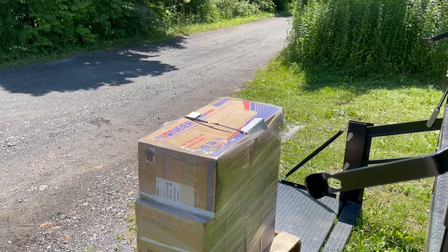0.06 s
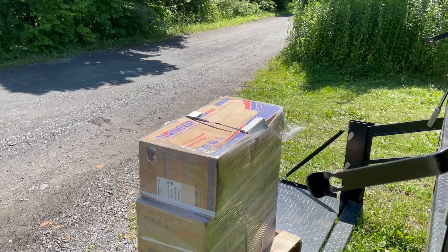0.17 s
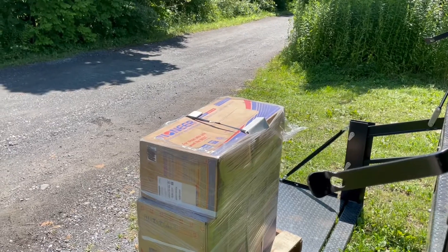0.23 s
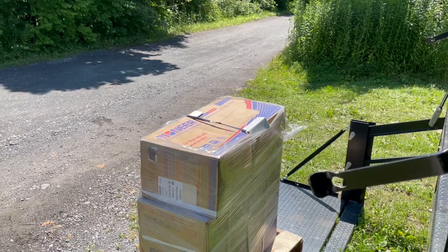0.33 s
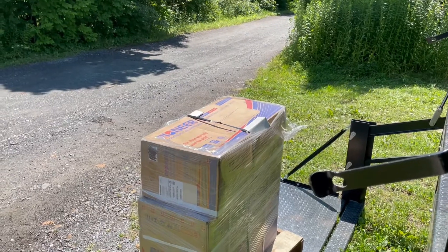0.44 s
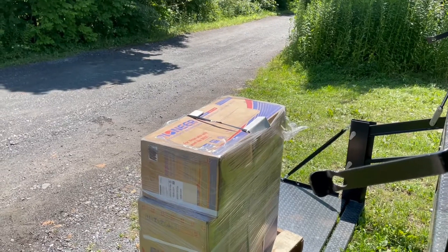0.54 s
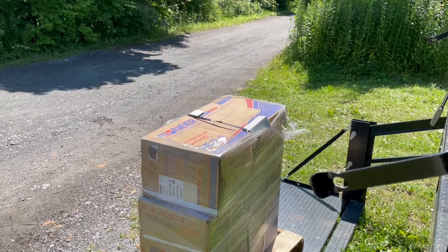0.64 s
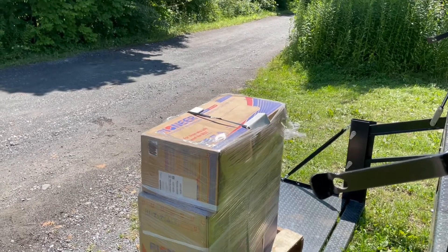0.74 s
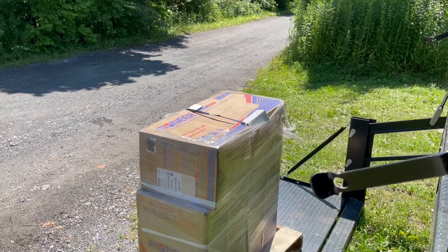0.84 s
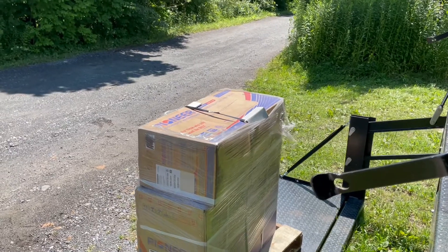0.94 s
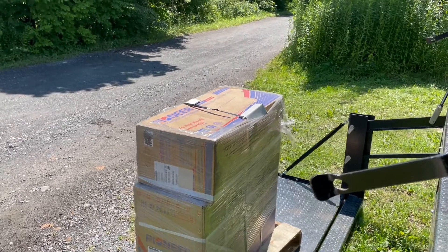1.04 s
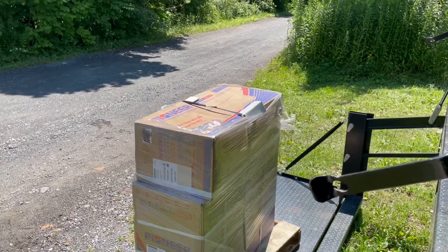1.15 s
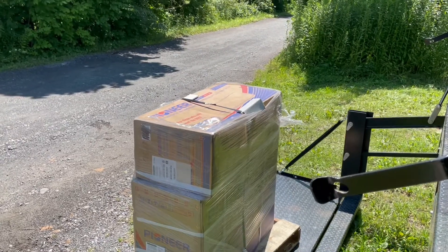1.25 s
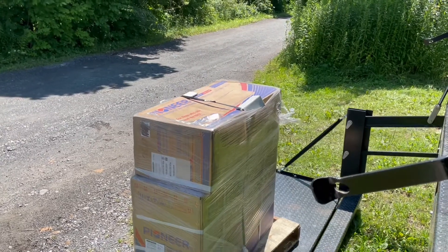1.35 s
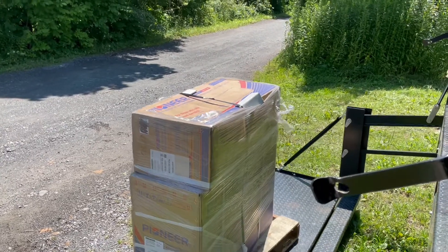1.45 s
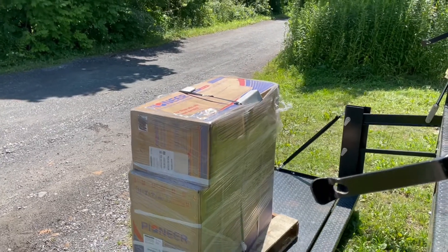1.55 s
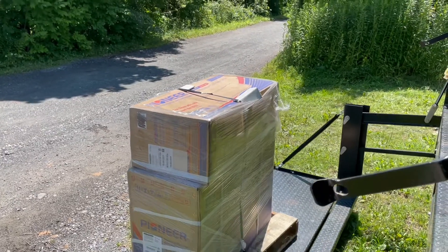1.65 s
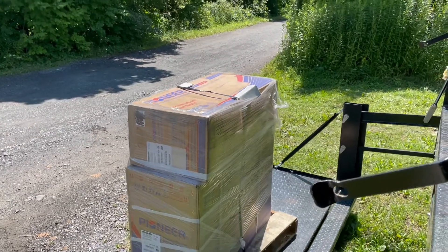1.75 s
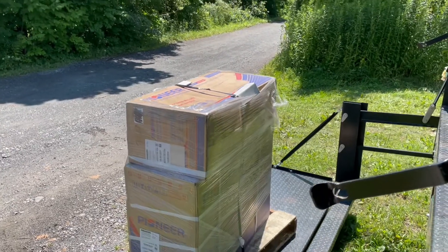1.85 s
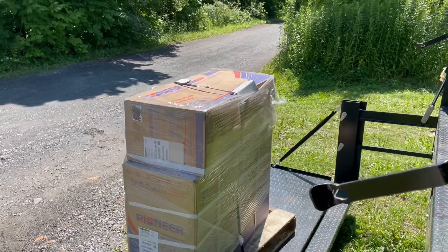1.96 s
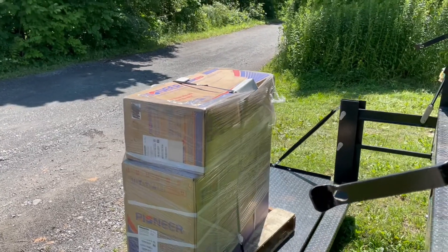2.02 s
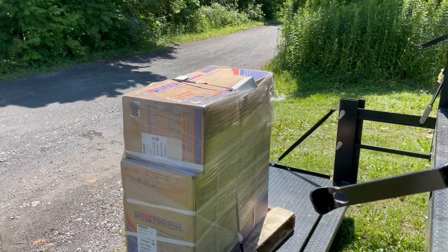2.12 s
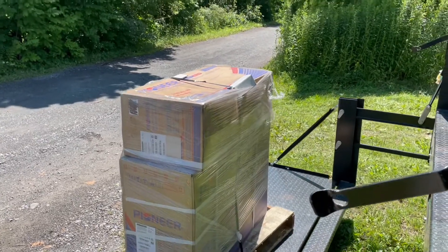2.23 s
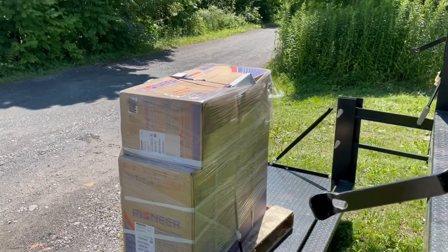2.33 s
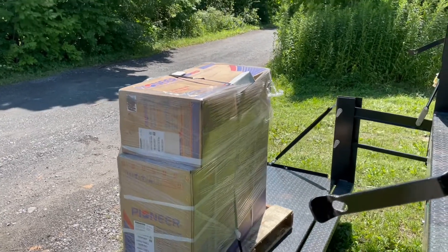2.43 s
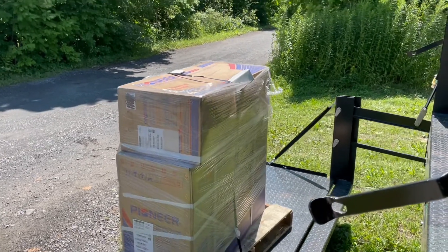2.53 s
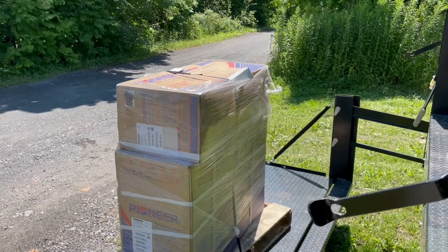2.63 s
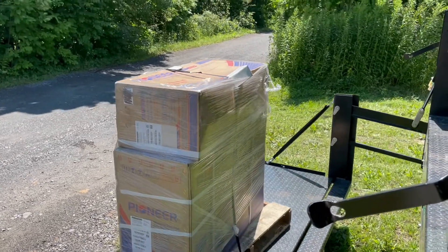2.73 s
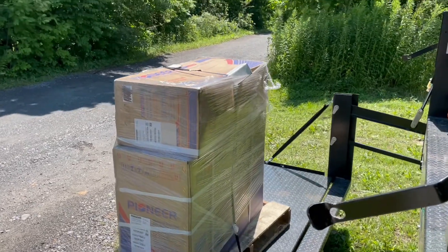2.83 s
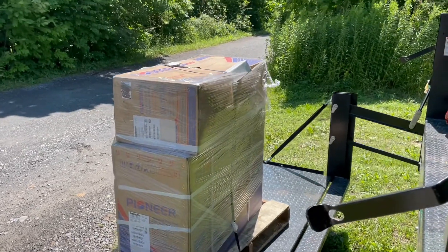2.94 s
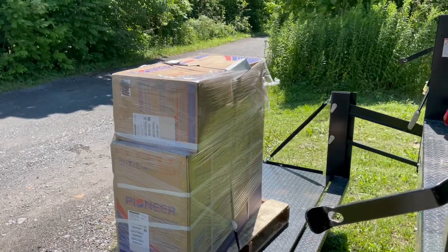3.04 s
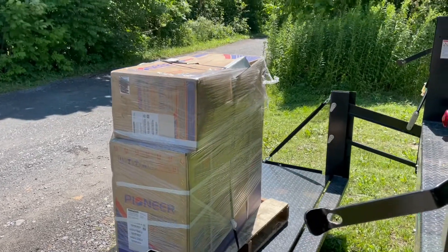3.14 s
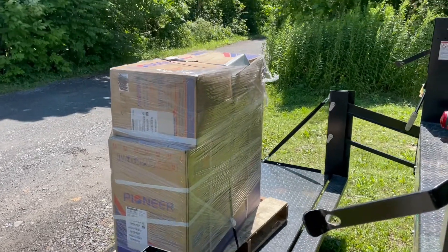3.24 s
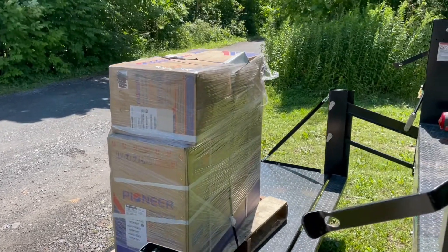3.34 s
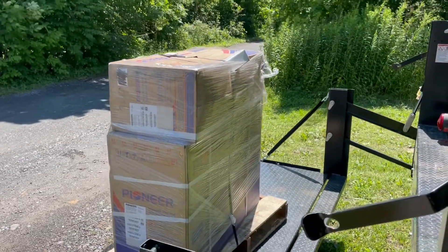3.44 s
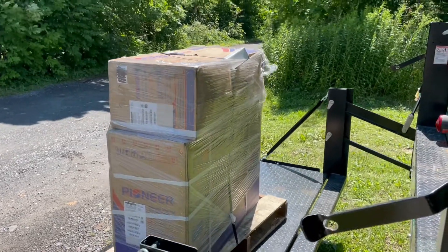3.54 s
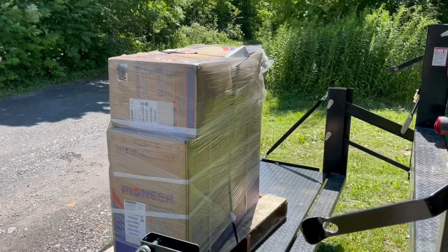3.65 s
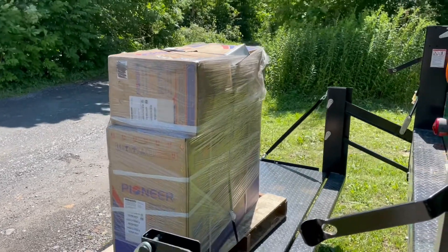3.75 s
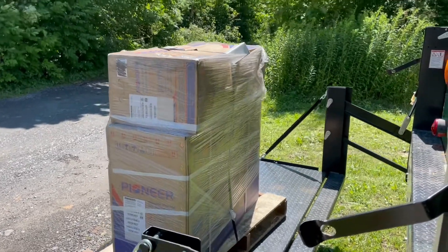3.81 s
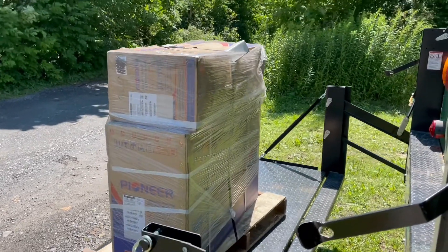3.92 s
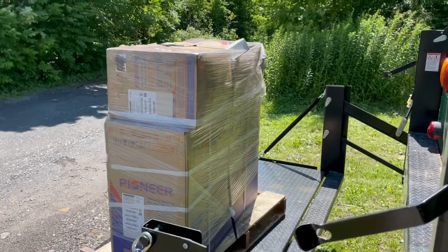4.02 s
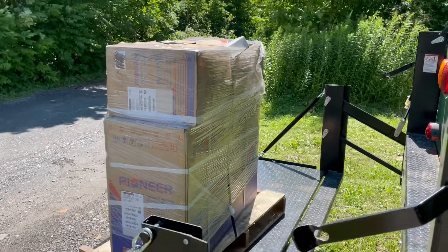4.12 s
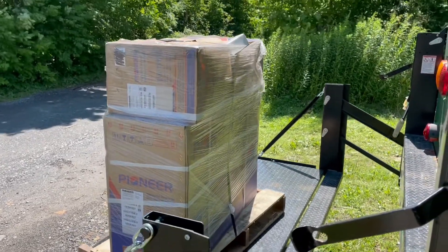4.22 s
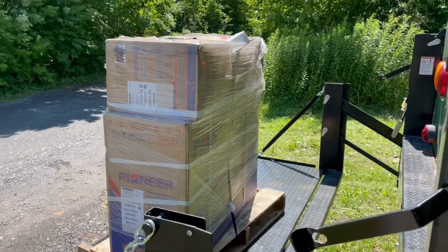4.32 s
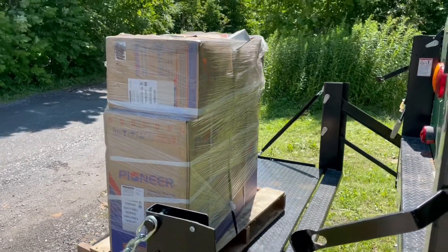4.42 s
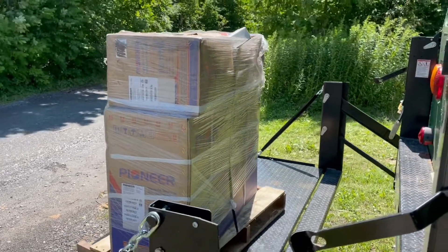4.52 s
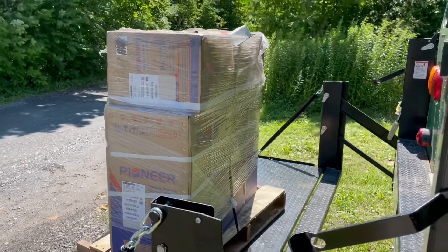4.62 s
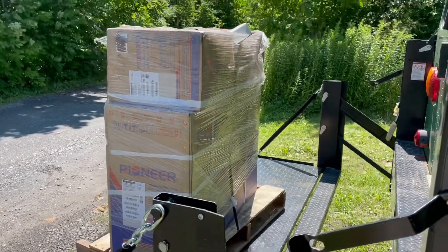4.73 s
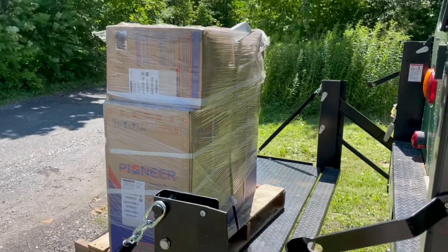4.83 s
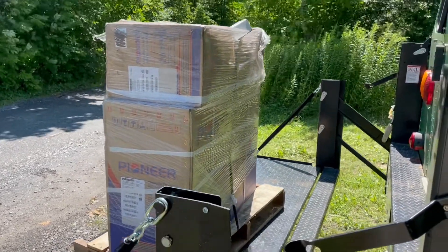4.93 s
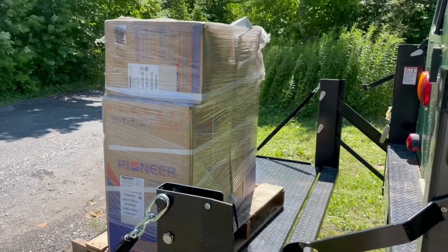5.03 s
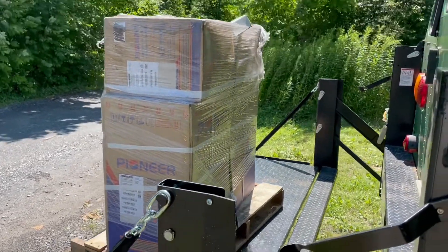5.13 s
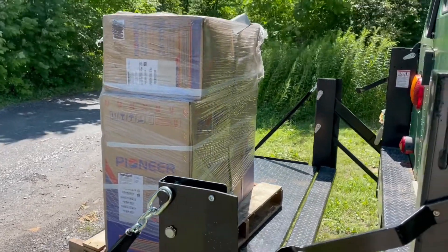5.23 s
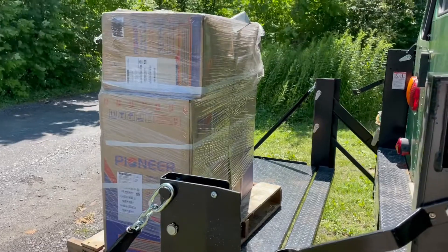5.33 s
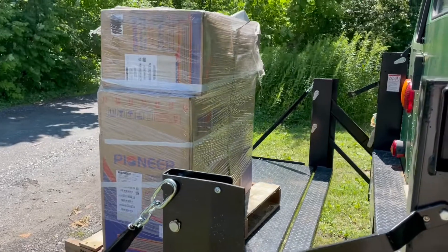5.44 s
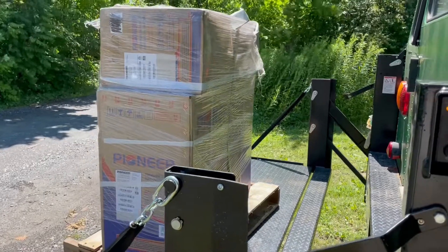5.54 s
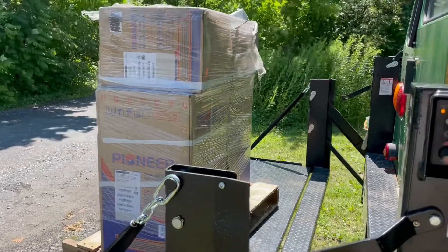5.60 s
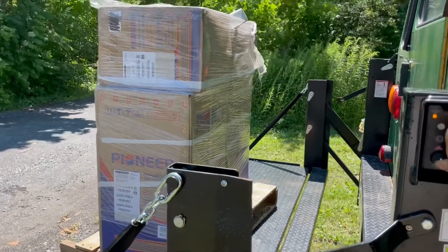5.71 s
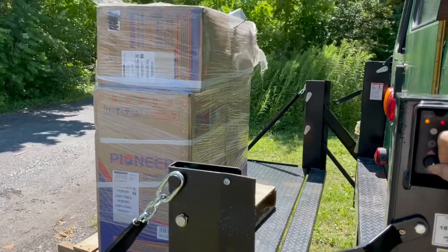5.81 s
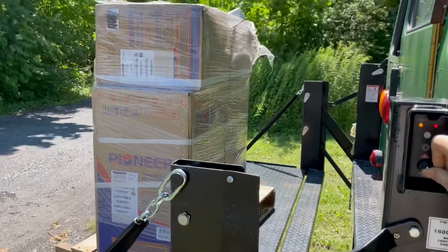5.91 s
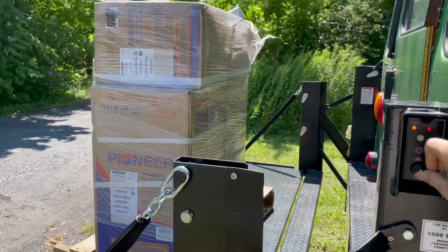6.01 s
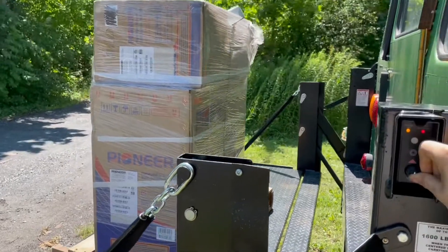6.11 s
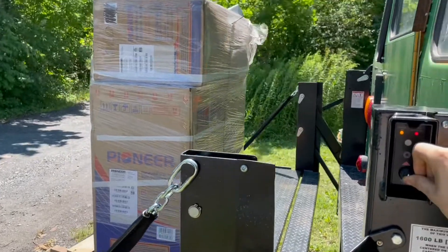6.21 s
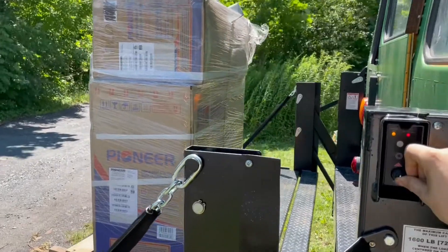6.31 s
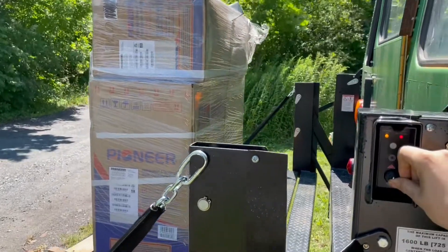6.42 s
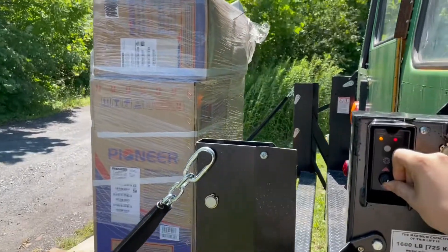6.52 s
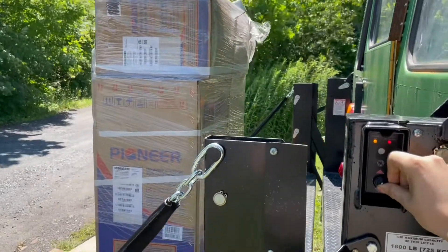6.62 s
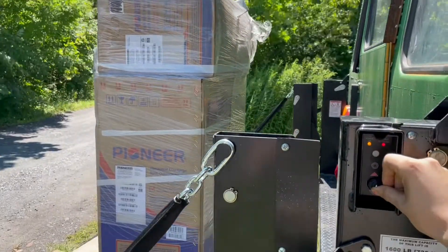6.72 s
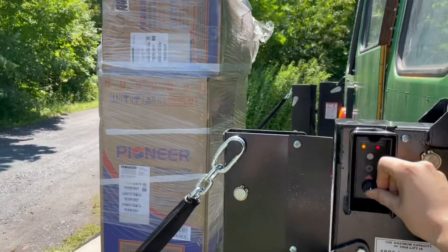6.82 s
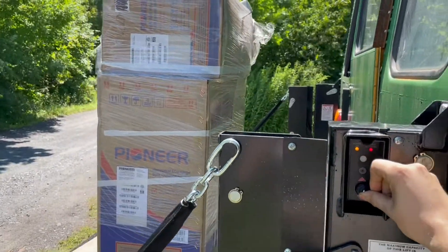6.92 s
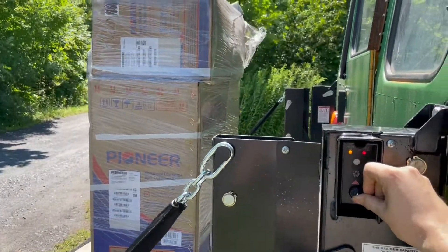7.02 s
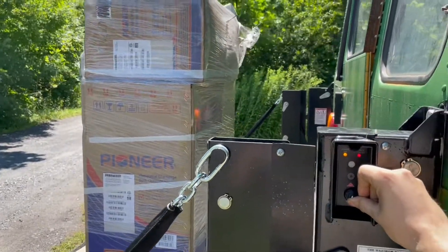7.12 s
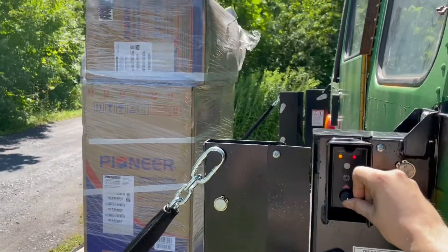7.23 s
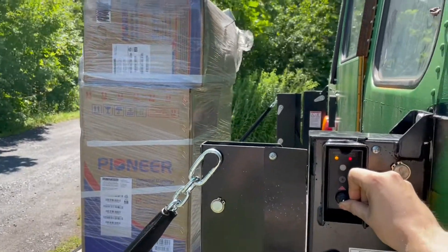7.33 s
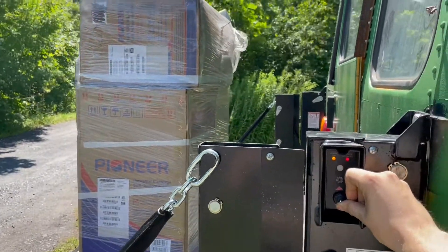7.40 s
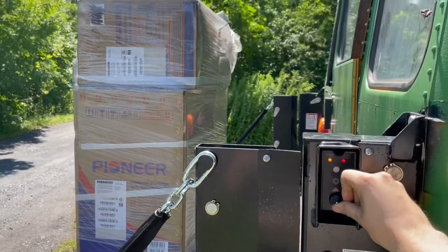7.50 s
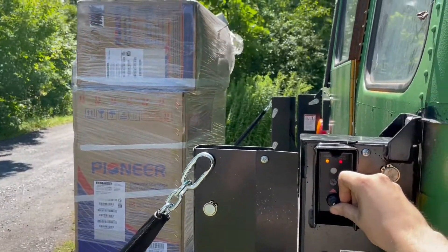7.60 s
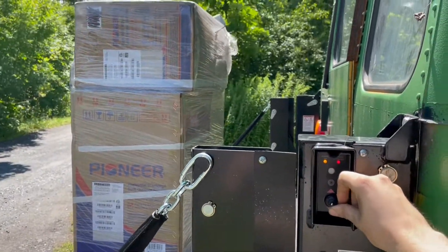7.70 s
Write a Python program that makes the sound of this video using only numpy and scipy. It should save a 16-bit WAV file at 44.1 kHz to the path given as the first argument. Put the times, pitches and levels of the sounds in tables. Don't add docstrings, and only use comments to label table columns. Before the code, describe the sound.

A handheld stereo microphone moves nearer a platform lift on an idling bus. After half a second of rumble, a click and rough growl launch a rising gear whine that holds for about six seconds, its overtones beating and shimmering. Muffled handling thumps gather, a bird gives a tiny call, then a double metallic clack ends the motor. A brief breathy release, gusts and heavier knocks follow.

```python
import sys
import numpy as np
from scipy import signal
from scipy.fft import rfft, irfft
from scipy.io import wavfile
from scipy.ndimage import uniform_filter1d

SR = 44100
rng = np.random.default_rng(int(sys.argv[2]) if len(sys.argv) > 2 else 0)


def natural_amplitude(level_db):
    exponent = np.asarray(level_db, float) / 20
    return 10 ** exponent


def to_wav(s):
    ch = np.atleast_2d(s).T
    pcm = np.round(np.clip(ch, -1, 1) * 32767)
    wavfile.write(sys.argv[1], SR, pcm.astype(np.int16))


N = 342216
T = np.arange(N) / SR
START_S, STOP_S = 0.51, 6.742


def curves(table, **ends):
    s, *columns = np.transpose(table)
    return [np.interp(T, s, c, **ends) for c in columns]


def walk(rate):
    k = int(SR / rate)
    held = np.repeat(rng.standard_normal(N // k + 1), k)
    return 1.347 * uniform_filter1d(uniform_filter1d(held, k), k)[:N]


def turns(hz):
    return 2 * np.pi * np.cumsum(hz * np.ones(N)) / SR


def random_phase():
    return 2 * np.pi * rng.random()


def tone(phase, db):
    return np.sqrt(2) * natural_amplitude(db) * np.sin(phase + random_phase())


def bump(s, half):
    return np.exp(-((T - s) / half) ** 2)


def decay(t, t60):
    return natural_amplitude(-60 * t / t60)


def resonance_db(hz, table):
    return sum(db / (1 + (2 * (hz - f) / width) ** 2) for f, width, db in table)


def echo(share, per_s, s, t):
    return share * np.exp(2j * np.pi * per_s * (t - s))


# (frequency [Hz], lead [rad])
PORT_PHASE = [(0, 0), (1000, -.45), (1750, -.9), (2400, .6), (3100, .7), (4500, .2), (5900, -.2),
              (6550, -2.8), (7900, -3.5), (9300, -4.8), (10700, -6.28), (12000, -6.4), (13400, -9.1),
              (14200, -9.42)]


def ports(x, balance):
    hz = np.fft.rfftfreq(N, 1 / SR)
    level = natural_amplitude(np.interp(hz, *np.transpose(balance)) / 2)
    half = level * np.exp(.5j * np.interp(hz, *np.transpose(PORT_PHASE)))
    return irfft(rfft(x) * np.array([half, 1 / half]), N)


def hiss(shape, flicker_db, rate, channels):
    hz = np.fft.rfftfreq(N, 1 / SR)[1:]
    shape_hz, shape_db = np.transpose(shape)
    colour = natural_amplitude(np.interp(np.log(hz), np.log(shape_hz), shape_db, -120, -120))
    white, out = rfft(rng.standard_normal((channels, N))), 0
    for centre in 30 * 2 ** np.arange(0, 9.6, .5):
        band = np.clip(1 - 2 * abs(np.log2(hz / centre)), 0, 1)
        out = out + natural_amplitude(flicker_db * walk(rate)) * irfft(white * np.r_[0, band * colour], N)
    return out / np.sqrt(np.mean(out ** 2))


def ring(modes, s, spread_db, stretch):
    first, last = int(s * SR), int((s + 1.2 * stretch) * SR)
    t = np.clip(T - s, 0, None)[first:last]
    out = np.zeros(N)
    for hz, db, t60 in modes:
        bloom = 1 - np.exp(-t * hz / 2.5)
        detuned = hz * (1 + 0.0034 * rng.standard_normal())
        wave = np.sin(2 * np.pi * detuned * t) * decay(t, t60 * stretch) * bloom
        out[first:first + len(t)] += natural_amplitude(db + spread_db * rng.standard_normal()) * wave
    return out


def whistle(hz, db, start_s, end_s, rough):
    gate = np.clip(np.minimum(T - start_s, end_s - T) / 0.007, 0, 1)
    return gate * tone(turns(hz) + rough * walk(50), db) * (1 + rough * walk(80))


# (time [s], tooth rate [Hz])
PUMP = [
    (.5, 880),
    (1.5, 890.8),
    (2.5, 902.5),
    (4, 918.5),
    (4.6, 927),
    (5.4, 933),
    (6.45, 933.6),
    (6.6, 927),
    (6.74, 921),
]


def tooth_rate():
    shortfall = 550.6 * np.exp(-np.clip(T - PUMP[0][0], 0, None) / .155)
    return curves(PUMP)[0] - shortfall


# (shaft multiple, time [s], half length [s], change [dB])
SHADES = [
    (13, 2.5, .25, -6),
    (13, 4.6, .25, -1.5),
    (13.5, 2.9, .55, 9),
    (13.5, 6.25, .45, 8),
    (64, 6.19, .04, 8),
    (65, 4.05, .07, -5),
    (65, 4.21, .07, 6),
    (77, 5.2, .8, -5),
    (143, 4.8, .8, -11),
    (169, 4.5, .6, -8),
]


def shade(order):
    return sum(db * bump(s, half) for k, s, half, db in SHADES if k == order)


# (frequency [Hz], width [Hz], lift [dB])
HOUSING = [(500, 130, 3), (695, 37, 13.5), (836, 22, 5), (1240, 260, 7.5), (1654, 132, 6.5),
           (2350, 38, 11.5), (3770, 250, -0.5), (4445, 190, 7)]
# (frequency [Hz], width [Hz], lift [dB])
SWEEP_PANELS = [(1150, 150, 8), (1480, 200, 7), (2090, 130, 10), (2690, 140, 10), (3280, 120, 7),
                (3990, 140, 7), (4430, 160, 9), (5400, 140, 7), (5760, 250, 7)]
# (frequency [Hz], width [Hz], change [dB])
SWEEP_SPOTS = [(700, 30, 4), (770, 80, -5), (821, 10, 7), (834, 7, -14), (856, 26, -5), (1580, 50, -5),
               (1660, 60, 4), (1860, 160, -8), (2220, 110, -7), (2345, 45, 2), (3325, 40, -10),
               (3440, 30, -8), (4115, 60, -12), (4270, 160, -6)]
# (share [0-1], delay [s])
SWEEP_ECHOES = [(.35, 0.00153), (.35, .0041)]


def paths(hz, echoes):
    settled_s = 1.1
    t, hz = T[::88], hz[::88]
    lift_db = resonance_db(hz, HOUSING) * np.clip((t - START_S) / .08, 0, 1)
    paths_sum = 1 - sum(echo(*e, np.maximum(t, settled_s)) for e in echoes)
    beat_db = 20 * np.log10(abs(paths_sum) + 0.032)
    chop = abs(1 - sum(share * np.exp(2j * np.pi * hz * lag) for share, lag in SWEEP_ECHOES))
    sweep_db = resonance_db(hz, SWEEP_PANELS) + 20 * np.log10(chop + 0.047)
    sweeping = np.clip((settled_s - t) / .3, 0, 1)
    spot_db = np.clip((settled_s + .05 - t) / .1, 0, 1) * resonance_db(hz, SWEEP_SPOTS)
    return np.interp(T, t, spot_db + lift_db + beat_db + sweeping * sweep_db)


MAIN_ORDERS = (13, 26, 39, 52, 65, 78, 91, 12, 14, 20, 21, 15, 25, 27, 38, 51, 53, 54, 64, 66, 79, 80, 83,
               92, 93)
# (level in mid-lift [dB], growth as the listener nears [dB per s])
MAIN_DB = [(-36.5, 2.5), (-59, 0.8), (-55.5, -1.0), (-55.5, 2), (-50.5, 3), (-54, 1.5), (-56.5, -2.9),
           (-59, 0), (-60, -4.2), (-68, 3), (-68, -2), (-64, -0.5), (-66, -0.4), (-61.3, -0.4), (-66, -0.8),
           (-76, 4), (-70.5, 3), (-67.5, .6), (-69.5, 2), (-68, -0.5), (-68, 0.5), (-69.5, 0), (-68, 2),
           (-64.4, -0.5), (-63, -1)]
# (share [0-1], cancellations [per s], one cancelling moment [s])
GROUND = [(0.33, -0.386, 4.65), (0.92, -0.241, 3.57), (0.47, 0.57, 3.76), (0.76, -0.344, 3.03),
          (0.45, 0.286, 3.39), (0.43, -0.346, 2.65), (0.41, -0.84, 4.64), (0.71, 0.07, 3.36),
          (0.42, 0.574, 4.21), (0.68, -0.605, 4.67), (0.65, -0.334, 4.06), (0.66, 0.859, 4.45),
          (0.33, -0.82, 3.98), (0.68, 0.592, 2.51), (0.91, -0.051, 3.31), (0.71, 0.238, 2.1),
          (0.56, 1.228, 6.95), (0.81, -0.885, 3.4), (0.51, 0.609, 4.47), (0.44, -0.897, 4.71),
          (0.6, -0.221, 2.1), (0.79, 0.53, 3.16), (0.25, 1.165, 3.52), (0.14, 1.004, 4.49),
          (0.32, -1.412, 3.98)]
WALL = [(0.1, -0.879, 4.4), (0.45, 0.534, 4.61), (0.46, 0.338, 3.89), (0.48, 1.158, 3.27),
        (0.49, -0.467, 4.07), (0.64, 0.388, 3.72), (0.77, -0.224, 7.02), (0.8, -0.569, 3.54),
        (0.92, 0.461, 3.17), (0.87, -0.166, 2.15), (0.56, 1.115, 3.19), (0.5, 0.664, 3.43),
        (0.65, 1.063, 4.73), (0.62, 0.88, 5.09), (0.83, -1.583, 4.72), (0.61, 0.788, 3.41),
        (0.48, 1.745, 4.28), (0.92, -0.46, 3.81), (0.71, 1.18, 4.23), (0.74, -0.221, 6.46),
        (0.92, 0.879, 3.6), (0.6, -1.014, 3.56), (0.63, 0.727, 4.0), (0.43, -0.581, 4.37),
        (0.33, -0.705, 4.7)]
PLATFORM = [(0.86, -0.048, 4.45), (0.53, -0.423, 5.21), (0.45, 0.894, 4.68), (0.35, 0.888, 3.38),
            (0.92, 0.07, 5.09), (0.34, -1.157, 4.38), (0.8, 0.236, 1.97), (0.92, -0.201, 3.03),
            (0.86, 0.282, 5.21), (0.69, 0.478, 2.12), (0.56, 0.269, 4.31), (0.26, 1.135, 5.08),
            (0.92, 0.742, 3.66), (0.49, -0.365, 4.29), (0.77, -1.279, 4.97), (0.79, 0.561, 3.03),
            (0.88, 0.635, 3.32), (0.41, -1.13, 3.6), (0.8, -0.303, 4.04), (0.39, 0.547, 4.56),
            (0.66, 1.163, 4.56), (0.83, -0.218, 3.58), (0.55, 0.403, 3.83), (0.92, -0.28, 5.14),
            (0.9, -0.366, 4.03)]
# (share [0-1], cancellations [per s], one cancelling moment [s])
RAIL = [(0.16, -0.719, 4.07), (0.6, 0.734, 4.03), (0.44, 1.181, 4.56), (0.28, 0.435, 3.44),
        (0.23, 1.239, 4.3), (0.4, 1.639, 3.58), (0.53, -0.469, 3.42)]


def main_levels(hz, slow, load_db):
    settled = np.clip((T - START_S - .3) / .3, 0, 1)
    rail = list(RAIL) + [(0, 0, 0)] * len(MAIN_ORDERS)
    levels = []
    for order, (db, growth_db), *echoes in zip(MAIN_ORDERS, MAIN_DB, GROUND, WALL, PLATFORM, rail):
        k = order / 13
        path_db = paths(k * hz, echoes) + shade(order)
        sweep_db = (1 - settled) * (-1.5 - .45 * k)
        dull_db = 3.5 * (k - 1) * load_db / 35
        patchy_db = 8 * min(k / 3, 1) * slow * np.clip(1 + 1.6 * walk(28.5), 0, None)
        levels.append((k, db + growth_db * (T - 4) + path_db + sweep_db + dull_db - patchy_db))
    return levels


# (tooth multiple, level [dB])
TOP_TONES = [(8, -59), (9, -65), (10, -72), (11, -64), (12, -75), (13, -77), (14, -74), (15, -68),
             (16, -79), (17, -63)]


def tooth_tones(levels, shaft, load_db, judder):
    levels = list(levels)
    for k, db in TOP_TONES:
        waver_db = 1.8 * walk(2.5) + 2.0 * walk(14)
        levels.append((k, db + shade(k * 13) + .36 * k * load_db + waver_db))
    out = 0
    for k, db in levels:
        depth = 0.087 * (k > 2) + 40 * judder
        runout = depth * natural_amplitude(0.92 * walk(2.58)) * np.sin(shaft + random_phase())
        twice = 0.13 * (k > 2) * natural_amplitude(3.5 * walk(3.046)) * np.sin(2 * shaft + random_phase())
        phase = k * 13 * shaft + runout + twice + .022 * k * walk(90)
        out = out + (1 + runout) * tone(phase, db + (.6 + 170 * judder) * walk(35))
    return out


# (shaft multiple, level [dB])
SHAFT = [(2, -59), (3, -46), (4, -57), (5, -45), (6, -59), (7, -62), (8, -56), (9, -60), (10, -64),
         (11, -68), (12.5, -60), (13.5, -62), (14.5, -68), (16, -60), (17, -59), (18, -65), (22, -63),
         (23, -63), (24, -68), (28, -68), (29, -66), (31, -68), (33, -69), (35, -69), (37, -68), (56, -70),
         (57, -70), (63, -71), (68, -71), (74, -70), (77, -71), (84, -69), (89, -68)]


def shaft_orders(levels, shaft, slow):
    frame_db = 1.8 - 10.5 * np.exp(-np.clip(T - START_S, 0, None) / 0.98)
    out = 0
    for k, db in SHAFT:
        if k < 7:
            drive_db = frame_db
        else:
            drive_db = 6 * slow + 3.5 * np.tanh(walk(1.497))
        out = out + tone(k * shaft + 0.43 * walk(6), db + drive_db + shade(k) + 1.14 * walk(5))
    for k, db in levels:
        out = out + tone(k * 13 * shaft + .02 * k * walk(70), db + 1.1 * walk(12))
    return out


# (frequency [Hz], density [dB per Hz])
OIL = [(250, -10), (450, -5.5), (800, -3.5), (1200, -6), (1700, -10.5), (2500, -13.5), (3500, -15),
       (5000, -16), (6700, -10.5), (7500, -8.5), (10000, -21.5), (12000, -27), (14500, -23.5), (15900, -12)]
# (frequency [Hz], left minus right [dB])
PUMP_SIDE = [(100, 0), (400, -1.5), (900, 3.5), (2400, 6), (4400, 4), (6500, 9.5), (7000, 1), (12500, 2),
             (14000, 7.5), (15000, 7.5)]


def pump():
    on = np.clip(T - START_S, 0, None)
    hz = tooth_rate()
    speed = hz / 900
    slow = np.clip(1 - speed, 0, 1)
    judder = 0.00016 + 0.0327 * slow
    shaft = turns(hz * (1 + judder * walk(60.23))) / 13
    load_db = 35 * np.log10(np.minimum(speed, 1))
    levels = main_levels(hz, slow, load_db)
    tones = tooth_tones(levels[:7], shaft, load_db, judder) + shaft_orders(levels[7:], shaft, slow)
    oil = hiss(OIL, 0.9, 14, channels=2)
    oil = oil * (1 + 0.19 * np.sin(shaft)) * natural_amplitude(-45.5) * speed ** 1.1
    growl = hiss([(250, -15), (500, 6.0), (1200, 2), (2500, -28)], 2.2, 119.0, channels=1)[0]
    growl = growl * natural_amplitude(-40 - 54 * np.clip(on, 0, 2))
    running = np.clip(on / 0.025, 0, 1) * np.clip((STOP_S - T) / 0.0018, 0, 1)
    return running * (ports(tones + oil[0] + growl, PUMP_SIDE) + 0.82 * oil[1] * np.array([[1], [-1]]))


# (time [s], peak [dB], brightness [0-1], decay factor)
BLOWS = [
    (0.469, -40, 0.54, 0.33),
    (.487, -37, 0.8, 0.55),
    (.495, -33, 0.6, 1),
    (6.7421, -5, 0.2, 0.47),
    (6.746, -19, 0.8, 0.31),
    (6.752, -20, 0, 0.53),
    (6.762, -7, 0.89, 0.47),
    (6.779, -17, 0.1, 0.46),
    (6.813, -30, 0, 0.32),
    (6.852, -31, 0.16, 0.42),
]
# (frequency [Hz], level [dB], t60 [s])
DECK = [(136, 9, 0.47), (242, 5, 0.25), (338, -7, 0.14), (428, 1.5, 0.55), (550, 12.5, 0.13),
        (617, 10.5, 0.15), (703, 13.5, 0.071), (745, 4.5, 0.14), (1015, -5, 0.13), (1210, -2, 0.1),
        (1327, 3.5, 0.11), (1360, 2, 0.14), (1655, 2.5, 0.12), (2240, -2, 0.11)]
# (frequency [Hz], level [dB], t60 [s])
LATCH = [(2340, 12, 0.12), (2600, -7, .07), (3330, -9, .07), (3270, 8, 0.11), (3970, -14, 0.053),
         (4700, -33, 0.031), (5340, -3, .05), (6360, -7, .04)]
# (frequency [Hz], level [dB], t60 [s])
RING = [(645, -31.5, 2.2), (722, -35.5, 1.1), (1000, -35, .35), (550, -38, .7), (420, -30, .3),
        (135, -28, .3)]


def blows():
    low = hiss([(100, 2.0), (400, -0.5), (800, -4), (1600, -12.0), (3000, -23.0)], 0.94, 200, channels=2)
    high = hiss([(900, 0.0), (2500, -5), (6000, -8.5), (9000, -15.5), (15500, -33)], 0.94, 200, channels=2)
    out = ring(RING, STOP_S + .02, 0, 0.97) * (1 + 0.22 * walk(45)) * np.ones((2, 1))
    for s, db, bright, stretch in BLOWS:
        t = np.clip(T - s, 0, None)
        rise = 1 - np.exp(-t / 0.00025)
        boom = (1 - bright) * low * (1 - np.exp(-t / 0.019)) * decay(t, 0.38 * stretch)
        clash = .5 * bright * high * (decay(t, 0.091 * stretch) + 0.14 * decay(t, 0.56 * stretch))
        crash = boom + clash
        deck = 0.31 * (1 - bright) * ring(DECK, s, 2.1, stretch)
        latch = 0.072 * bright * ring(LATCH, s, 3.4, stretch)
        centre = ports(deck + latch + 0.8 * crash[0], PUMP_SIDE)
        out = out + natural_amplitude(db) * rise * (centre + 0.15 * crash[1] * np.array([[1], [-1]]))
    return out


# (time [s], half length [s], level [dB])
PUFFS = [
    (6.987, .012, -39),
    (7.034, .014, -41),
    (7.06, .008, -46),
    (7.115, .022, -46),
    (7.195, .022, -44),
]


def valve():
    start_s, length_s = 6.968, .255
    end_s = start_s + length_s
    fall = np.exp(-np.clip(T - start_s, 0, None) / 0.08)
    puffs = natural_amplitude(-48) + sum(natural_amplitude(db) * bump(s, half) for s, half, db in PUFFS)
    sigh = puffs * whistle(762 + 205 * fall, 0, start_s, end_s, rough=0.3)
    jet_shape = [(350, 11.0), (700, 0), (1300, -4.5), (3000, -25), (5500, -19), (7000, -20)]
    jet = hiss(jet_shape, 1.7, 20, channels=1)[0]
    opening = np.clip(np.minimum((T - start_s + 0.062) / 0.066, (end_s - T) / 0.012), 0, 1)
    return sigh + ports(natural_amplitude(-40.5) * opening * jet, PUMP_SIDE)


# (centre [s], peak [dB], pitch [Hz], length [s])
KNOCKS = [(5.332, -40, 70, 0.012), (5.435, -26, 86, 0.01), (5.604, -23, 99, 0.011),
          (5.756, -22.5, 120, 0.011), (5.862, -21.5, 89, 0.028), (6.001, -21, 78, 0.022),
          (6.047, -20.5, 86, .015), (6.26, -19.5, 99, .009), (6.29, -17.5, 91, 0.014),
          (6.37, -20, 83, 0.019), (6.486, -23, 85, .02), (6.541, -36, 133, 0.0092),
          (6.568, -18.5, 87, 0.023), (6.594, -14, 84.5, 0.0085), (6.635, -22, 86, .018),
          (6.691, -19, 78.4, 0.012), (7.054, -29, 87.6, 0.013), (7.1925, -17, 380, 0.002),
          (7.198, -19, 120, .004), (7.212, -13, 170, 0.003), (7.322, -17, 103, .016),
          (7.348, -20, 300, .003), (7.353, -14.5, 110, 0.011), (7.422, -11, 115, 0.007),
          (7.478, -16.5, 148, 0.0089), (7.495, -20.5, 261, 0.0041), (7.505, -11, 99, 0.0089),
          (7.539, -20, 100, 0.026), (7.688, -16, 86, 0.01)]


def knocks():
    out = np.zeros((2, N))
    rustle = hiss([(150, -2.0), (300, 19.0), (550, -6.5), (900, -21)], 5.0, 100, channels=2)
    for s, db, hz, length in KNOCKS:
        t = T - s
        swell = bump(s, np.where(t < 0, length, 0.98 * length))
        cycle = 2 * np.pi * hz * t
        push = -np.sin(cycle + 0.38 * np.sin(cycle))
        lean = natural_amplitude(2.0 * rng.standard_normal() * np.array([[.5], [-.5]]))
        edge_db = min(-19.5 + 24 * np.log2(hz / 90), -8.5)
        out += natural_amplitude(db) * lean * swell * (push + natural_amplitude(edge_db) * (0.5 * rustle[0] + 0.66 * rustle))
    return out


def duck():
    return 1 - .7 * np.max([bump(s, 1.5 * length) for s, db, hz, length in KNOCKS], axis=0)


# (time [s], level [dB])
NEAR = [(0, -4.5), (.15, -1.5), (.5, -1), (1, -6.5), (1.8, -4.5), (3.2, -3), (4.5, 1), (5.2, 3.5),
        (6.5, 4.5), (7.76, 5)]


def closeness():
    return curves(NEAR)[0]


# (multiple of 25.2 Hz, level [dB])
ENGINE = [(2, -44), (3, -51.5), (4, -45), (5, -48.5), (6, -53.5), (7, -48.5), (8, -59.5), (9, -52),
          (10, -51.5), (11, -55), (12, -47), (13, -49.5), (14, -53.5)]
# (multiple of 86.16 Hz, level [dB])
FAN = [(1, -37.5), (2, -49.5), (3, -45.5), (4, -48.5), (5, -101), (6, -53.5)]
# (share [0-1], cancellations [per s], one cancelling moment [s])
FAN_ECHO = (0.4, 0.27, 3.54)


def bus():
    near_db = closeness()
    crank = turns(25.2 * (1 + 0.00425 * walk(4)))
    fan = turns(86.16 * (1 + 0.00281 * walk(3.003)))
    out = np.zeros((2, N))
    for k, db in ENGINE:
        sides = np.array([[1.], [.2 if k == 7 else 1.]])
        out += sides * tone(k * crank, db + 0.095 * near_db + 1.5 * walk(5))
    for k, db in FAN:
        if k == 1:
            path_db = near_db
        elif k == 3:
            path_db = 0.94 + 20 * np.log10(abs(1 - echo(*FAN_ECHO, T)))
        else:
            path_db = 0.52 * near_db
        sides = np.array([[1.], [1. if k % 2 else .1]])
        out += sides * tone(k * fan, db + path_db + 2.9 * np.tanh(walk(8)))
    return out


# (frequency [Hz], width [Hz], level [dB])
BAY = [(578, 58, -51.5), (903, 32, -56.5), (1176, 67, -57), (1603, 56, -60.5), (2225, 36, -65),
       (2490, 290, -63.5), (2870, 130, -66)]


def bay():
    hz, white = np.fft.rfftfreq(N, 1 / SR), rfft(rng.standard_normal(N))
    colour = 0
    for f, width, db in BAY:
        unit_power = np.sqrt(SR / np.pi / width)
        colour = colour + natural_amplitude(db) * unit_power / np.hypot(1, 2 * (hz - f) / width) ** 2
    level = natural_amplitude(2.4 * np.tanh(walk(22)) + 0.62 * closeness())
    return ports(irfft(white * colour, N) * level, [(0, 1), (9000, 1)])


# (time [s], level [dB])
GUST = [
    (4.9, -58),
    (5.3, -37),
    (6.3, -34),
    (6.7, -30.5),
    (6.9, -26),
    (7.15, -30),
    (7.5, -26),
    (7.65, -32),
    (7.76, -29),
]


def gusts():
    shape = [(28, -24), (45, -2.5), (80, 0), (130, -6), (250, -14), (380, -18), (600, -35)]
    noise = hiss(shape, 2.2, 14, channels=3)
    return natural_amplitude(curves(GUST, left=-90)[0]) * (0.91 * noise[0] + 0.5 * noise[1:])


# (time [s], pitch [Hz], level [dB])
BIRD = [
    (6.617, 4480, -56),
    (6.635, 4270, -54),
    (6.657, 4130, -48),
    (6.68, 4310, -51),
    (6.71, 4380, -58),
]


def bird():
    return whistle(*curves(BIRD), BIRD[0][0], BIRD[-1][0], rough=0.11)


# (frequency [Hz], density [dB per Hz])
AIR = [(25, -27), (50, 2.5), (85, -9), (140, -13), (200, -15), (300, -14.5), (450, -23), (800, -25.5),
       (1700, -29.5), (3500, -38), (6500, -40), (10000, -45), (13000, -53), (15900, -60)]


def air():
    noise = hiss(AIR, 1.0, 8.6, channels=3)
    diffuse = signal.sosfilt(signal.butter(2, [110, 5200], "band", fs=SR, output="sos"), noise[1:])
    after_db = 6 * np.clip((T - STOP_S) / 0.17, 0, 1)
    level = natural_amplitude(-39 + 0.045 * closeness() + after_db)
    return level * (0.54 * ports(noise[0], [(0, 0), (9000, 0)]) + 0.77 * diffuse)


def scene():
    mechanism = pump() + blows() + valve() + knocks()
    return mechanism + duck() * (bus() + gusts()) + bay() + bird() + air()


def roll_off(x):
    return signal.sosfilt(signal.butter(12, 15735, fs=SR, output="sos"), x)


def record(dry):
    fade = np.clip((T[-1] - T) / .0015, 0, 1)
    mix = fade * np.tanh(1.537 * dry) / 1.692
    return roll_off(mix)


dry = scene()
out = record(dry)
to_wav(out)
```